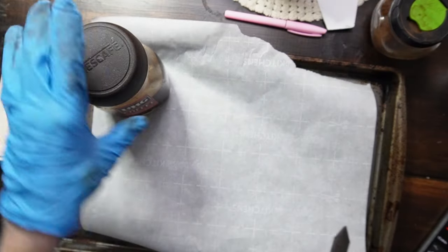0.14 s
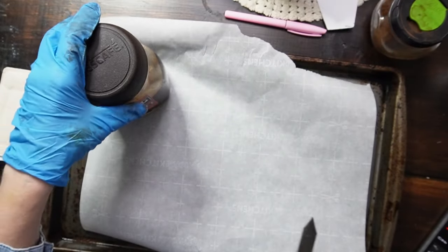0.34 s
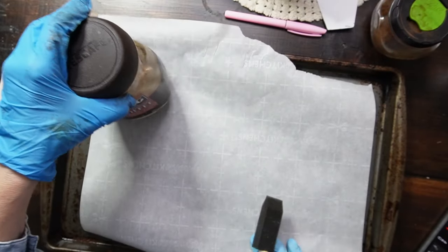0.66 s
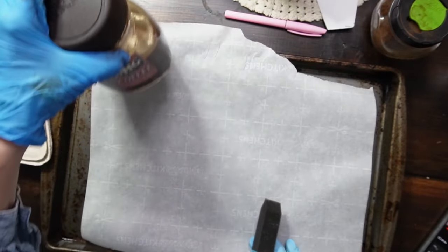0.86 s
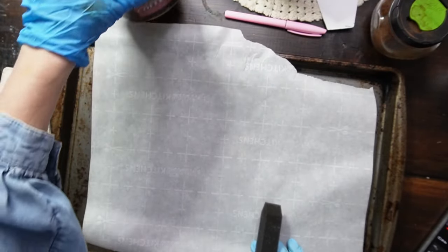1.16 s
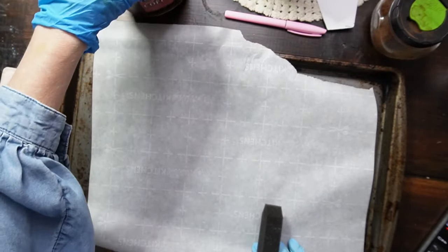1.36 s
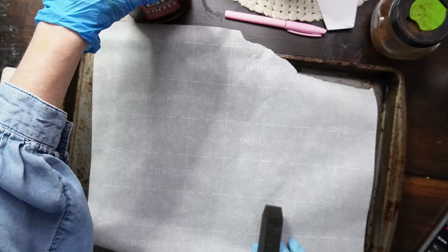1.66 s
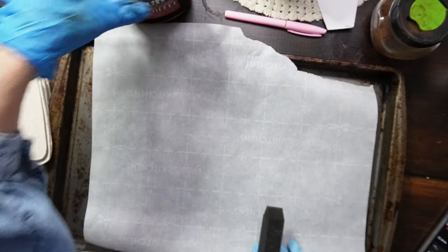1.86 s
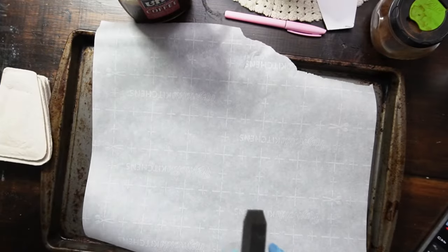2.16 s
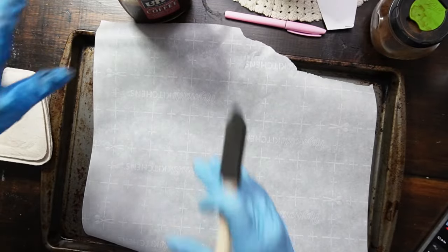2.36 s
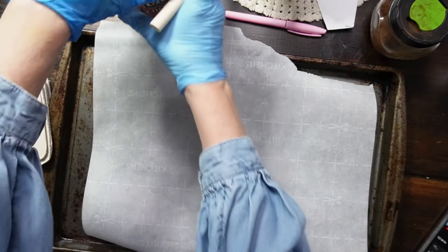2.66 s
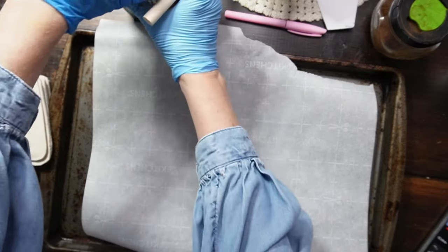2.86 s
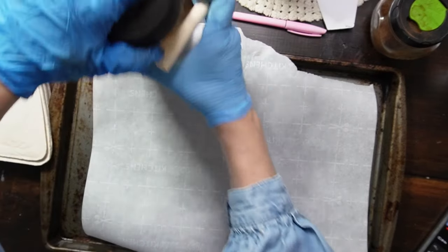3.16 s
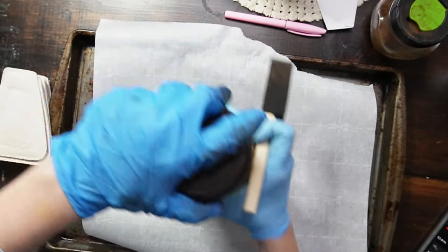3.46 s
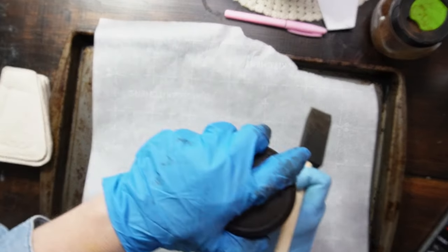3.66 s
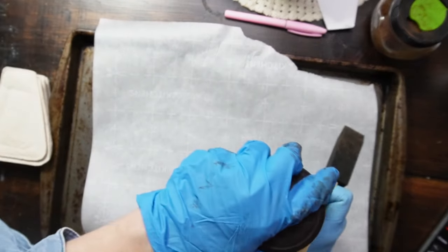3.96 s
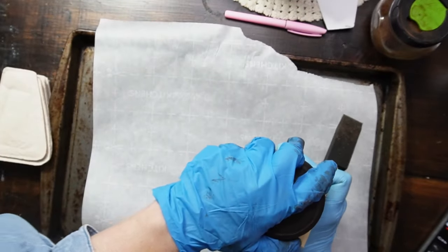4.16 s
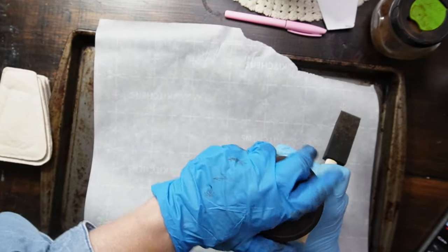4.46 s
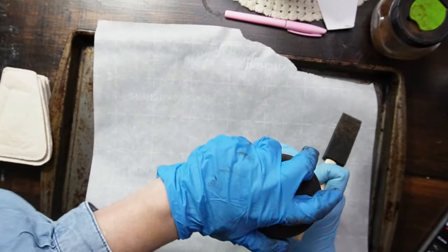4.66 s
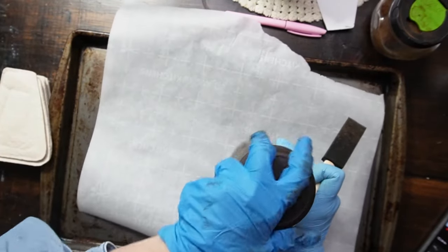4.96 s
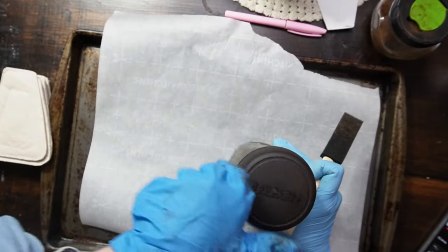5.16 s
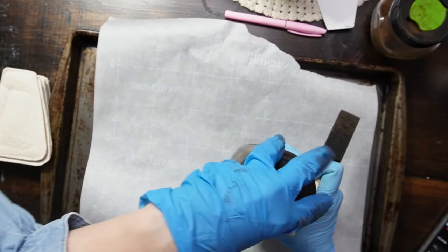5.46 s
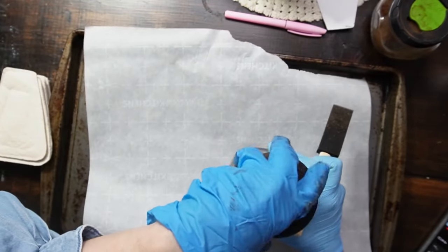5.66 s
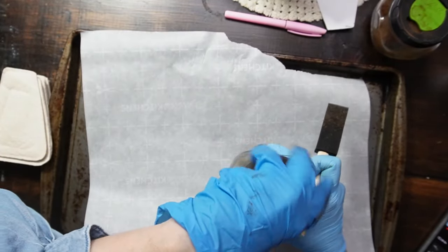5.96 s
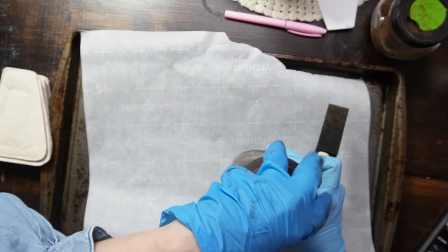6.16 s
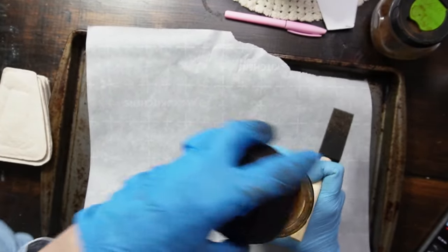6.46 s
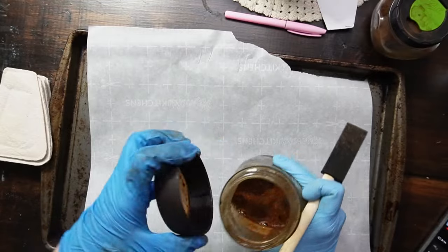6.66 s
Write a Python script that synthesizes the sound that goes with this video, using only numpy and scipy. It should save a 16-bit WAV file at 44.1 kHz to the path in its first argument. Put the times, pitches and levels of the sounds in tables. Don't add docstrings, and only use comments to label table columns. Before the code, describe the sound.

In a small quiet room, very close stereo microphones catch a jar dragged across crisp baking paper with dense crackles, then set down with a wooden knock. Gloves brush softly and squeak once on glass, with light tool taps. A stuck plastic lid creaks, jolts hard, grinds through gritty thread, then rattles and clinks sharply on the glass rim before soft rubbing ends it.

```python
import sys
import numpy as np
from scipy import signal
from scipy.io import wavfile
from scipy.ndimage import uniform_filter1d

SR = 44100
rng = np.random.default_rng(int(sys.argv[2]) if len(sys.argv) > 2 else 0)


def log_audio(samples):
    frames = np.atleast_2d(samples).T
    limited = np.clip(frames, -1, 1)
    pcm = np.round(limited * 32767).astype(np.int16)
    wavfile.write(sys.argv[1], SR, pcm)


def ratio(d):
    e = np.asarray(d, float) / 20
    return 10 ** e


N = 300621

# (frequency [Hz], density [dB per Hz])
RUB_COLOUR = [(150, -79.5), (410, -36.5), (700, -13.5), (779, -12.5), (996, -7.5), (1270, 4), (1650, 8.5),
              (2390, 9.5), (4950, 4.5), (9000, -20.5), (11700, -66), (19800, -120)]


def evened(x):
    return x / np.sqrt(np.mean(x ** 2) + 1e-20)


def read(points, hz):
    f, value = np.transpose(points)
    return np.interp(np.log(hz + 1), np.log(f + 1), value)


def add(mix, s, sound):
    part = mix[round(s * SR):][:len(sound)]
    part += sound[:len(part)]


def colour(x, points):
    gain_db = np.maximum(read(points, abs(np.fft.fftfreq(4096, 1 / SR))), -100)
    log_gain = np.log(ratio(gain_db))
    phase = -signal.hilbert(log_gain).imag
    taps = np.fft.ifft(np.exp(log_gain + 1j * phase)).real[:2048]
    return signal.oaconvolve(x, taps)[:len(x)]


def above(x, hz):
    return signal.sosfilt(signal.butter(4, hz, "high", fs=SR, output="sos"), x)


def resonate(x, hz, width_hz):
    r = np.exp(-np.pi * width_hz / SR)
    if np.ndim(hz) == 0:
        return 2 * signal.lfilter([1 - r], [1, -r * np.exp(2j * np.pi * hz / SR)], x).real
    turn = np.exp(2j * np.pi * np.cumsum(hz) / SR)
    return 2 * (turn * signal.lfilter([1 - r], [1, -r], x / turn)).real


def ring(modes, stretch=1, detune=0.0008, jumble=1):
    t = np.arange(SR // 3) / SR
    hz, db, t60_s = np.transpose(modes)[:, :, None]
    chance = rng.random((len(modes), 2))
    mode_hz = hz * (1 + detune * (2 * chance[:, :1] - 1))
    phase = 2 * np.pi * (mode_hz * t + jumble * chance[:, 1:])
    onset = 1 - np.exp(-t * hz * 0.75)
    return ratio(db - 60 * t / (t60_s * stretch)) * np.sin(phase) * onset


def chatter(x, decay_s):
    t = np.arange(2000) / SR
    run = rng.standard_normal(len(t)) * (rng.random(len(t)) < 0.02) * np.exp(-t / decay_s)
    run[0] = 3.5
    return signal.fftconvolve(x, run / np.linalg.norm(run))[:len(x)]


def slips(per_s, spread_db, clump_db, clump_s):
    size_db = spread_db * np.minimum(rng.exponential(1, N), 5)
    size = ratio(size_db) * np.sign(rng.standard_normal(N))
    clumps = evened(resonate(rng.standard_normal(N), 0, 1 / clump_s))
    return size * (rng.random(N) < per_s / SR) * ratio(clump_db * clumps)


def strokes(rows, plus_db=0):
    span_db, roundness = 20, 1.27
    t = np.arange(0, N, 32) / SR
    s, db, rise_s, fall_s = np.transpose(rows)[:4, :, None]
    away = np.where(t < s, (s - t) / rise_s, (t - s) / fall_s)
    shape_db = db + np.reshape(plus_db, (-1, 1)) - span_db * away ** roundness
    return np.interp(np.arange(N) / SR, t, (ratio(shape_db) ** 2).sum(0))


def ringing(rows, rings, per_s):
    drive = slips(per_s, 2.5, 1.5, 0.008) * np.sqrt(strokes(rows))
    ring_power = sum(ratio(2 * db) * np.pi * width_hz / SR for hz, width_hz, db in rings)
    plain = np.sqrt(per_s / SR * 3 * ring_power)
    rung = sum(ratio(db) * resonate(drive, hz, width_hz) for hz, width_hz, db in rings) / plain / 2
    return signal.sosfilt(signal.butter(2, [500, 5000], "band", fs=SR, output="sos"), rung)


def patchy(x, depth_db):
    z = signal.stft(x, SR, nperseg=128, noverlap=96)[2]
    field = rng.standard_normal(z.shape)
    field = uniform_filter1d(field, size=3, axis=0)
    field = evened(uniform_filter1d(field, size=14, axis=1))
    gain = ratio(depth_db * field - 0.115 * depth_db ** 2)
    return signal.istft(z * gain, SR, nperseg=128, noverlap=96)[1][:N]


def room_air():
    # (frequency [Hz], density [dB per Hz])
    air_colour = [(18, -43), (30, -42), (86, -24.5), (348, -6.5), (830, -2), (998, 0.5), (1600, 0.5),
                  (1880, 3.5), (3730, -3), (4730, -2.5), (7800, -14), (15700, -17), (16300, -30)]
    noise = rng.standard_normal((2, N))
    return ratio(-59.5) * evened(np.array([colour(n, air_colour) for n in noise]))


def room_tail(x):
    # (frequency [Hz], decay time t60 [s])
    decay = [(200, 0.39), (1000, 0.26), (4000, 0.28), (12000, 0.2)]
    taps = np.zeros((2, SR // 2))
    starts = np.arange(130, SR // 2 - 22, 22)
    at = starts + rng.integers(0, 22, (2, len(starts)))
    np.put_along_axis(taps, at, rng.choice([-1., 1.], at.shape), 1)
    hz, t, z = signal.stft(taps, SR, nperseg=256)
    fade = ratio(-60 * t / read(decay, hz)[:, None])
    tail = signal.istft(z * fade, SR, nperseg=256)[1]
    return signal.fftconvolve(x[None], tail / np.linalg.norm(tail[0]), axes=1)[:, :N]


def scattered(x):
    scatter = rng.standard_normal((2, 200)) * np.exp(-np.arange(200) / 50)
    early = signal.oaconvolve(x[None], scatter / np.linalg.norm(scatter[0]), axes=1)[:, :N]
    turn = 2 * np.pi * 4.3 * np.arange(N) / SR
    return early[0] * np.cos(turn) + early[1] * np.sin(turn)


def drumming():
    # (peak time [s], level [dB], rise [s], fall [s], pitch of the hollow [Hz])
    shudders = [(.555, -57, 0.021, 0.14, 241), (1.58, -34, 0.022, 0.2, 203.2), (1.69, -49, .05, .08, 203),
                (1.739, -56, 0.04, .08, 238), (1.815, -48, 0.03, 0.13, 220), (4.29, -42, 0.0073, 0.24, 249),
                (4.798, -29, 0.022, 0.064, 238), (4.92, -29, 0.086, 0.046, 193),
                (5.04, -36, .08, 0.21, 219), (5.165, -34.5, 0.087, 0.051, 238),
                (5.57, -39, 0.039, 0.069, 223), (5.45, -56, .02, 0.12, 207), (5.75, -65.5, .1, 0.056, 192),
                (5.87, -55, 0.012, 0.16, 266), (5.97, -48, 0.079, .3, 270),
                (6.042, -44.5, 0.23, 0.082, 334), (6.088, -35, 0.016, 0.15, 283),
                (6.23, -42.5, 0.065, 0.081, 222), (6.31, -56, .1, .1, 328), (6.37, -53.5, 0.18, 0.027, 422)]
    # (frequency [Hz], width [Hz], level [dB])
    tray_modes = [(162, 20, -7.5), (211, 15, 1.5), (259.6, 33, -0.5), (372, 53, -5)]
    drive = slips(400, 4.0, 1.6, 0.04)
    s, *_, pitch_hz = np.transpose(shudders)
    hollow_hz = np.interp(np.arange(N) / SR, s, pitch_hz)
    hollow = evened(resonate(resonate(drive, hollow_hz, 28), hollow_hz, 90))
    tray = evened(sum(ratio(db) * resonate(resonate(drive, hz, width_hz), hz, 4 * width_hz)
                      for hz, width_hz, db in tray_modes))
    return (0.68 * hollow + 0.49 * tray) * np.sqrt(strokes(shudders, -1.6))


def squeak():
    # (time [s], level [dB])
    swell = [
        (3.455, -79),
        (3.48, -41),
        (3.53, -31.5),
        (3.58, -43),
        (3.62, -57),
    ]
    drive = slips(4000, 2.1, 2.5, 0.006)
    s, db = np.transpose(swell)
    level_db = np.interp(np.arange(N) / SR, s, db, -120, -120)
    tone = resonate(drive, 3080, 200) + 0.45 * resonate(drive, 4300, 500)
    return ratio(level_db - 3.5) * evened(tone)


def taps():
    # (time [s], level [dB], frequency [Hz], decay time t60 [s])
    touches = [(3.228, -37, 1949, .1), (3.228, -35, 1740, .07), (3.265, -41, 1900, .08),
               (.527, -50, 1870, .06), (4.284, -21, 1940, .18), (6.075, -25, 287, .3),
               (5.04, -22, 720, .06), (5.152, -24.5, 250, .16), (4.906, -27, 205, .2), (1.57, -38, 143, .2),
               (4.9, -30, 510, .08), (1.553, -24, 2100, .08), (5.216, -28, 1350, .05),
               (6.076, -9, 1560, .03), (4.283, -34, 861, .1), (3.228, -40, 1300, .015),
               (4.79, -30, 520, .1), (2.87, -50, 4050, .12)]
    out = np.zeros(N)
    for s, db, hz, t60_s in touches:
        tap = ring([(hz, db, t60_s)])[0]
        add(out, s, chatter(tap, 0.012) if hz > 400 else tap)
    return out


def knocks():
    # (time [s], peak [dB], bass [dB relative], treble [dB relative], factor on t60 [1])
    blows = [(1.551, -16, -1, -6, 0.8), (1.794, -33.5, -7, 0, 0.5), (2.858, -35.5, 2.5, -21, 1.05),
             (4.279, -39, -28, 17, 1.8), (4.382, -25.5, -27, 1, 1.5), (4.428, -42, -17, -8, 1.1),
             (4.597, -9, -4.5, 6, 0.88), (4.997, -27.5, -26, -14.5, 1.5), (5.04, -19, -21, -12, 0.51),
             (5.191, -31, -10, -15, 0.28), (5.215, -30.5, 6, 2, 0.23)]
    # (frequency [Hz], level [dB], decay time t60 [s])
    wood = [(145, -5, .16), (203, -1, .15), (300, -3, .11), (430, -3, .1), (560, -1, .1), (673, -1, .09),
            (721, 0, .1), (860, 0, .08), (937, -2, .09), (1050, -3, .07), (1230, -4, .05), (1460, -4, .05),
            (1700, -3, .05), (1943, -2, .06), (2218, -4, .05), (2659, -4, .05)]
    # (frequency [Hz], density [dB per Hz])
    thud_colour = [(40, -36), (170, -13), (350, -8), (600, 0), (900, 0), (1400, -3), (2200, -9),
                   (5000, -60)]
    out, hz, t = np.zeros(N), np.array(wood)[:, 0], np.arange(SR // 3) / SR
    front = 1.4 * np.exp(-t / 0.0005)
    for s, db, bass_db, treble_db, stretch in blows:
        group_db = np.select([hz < 260, hz > 1500], [bass_db + 0.5, treble_db - 4], -11.)
        modes = chatter(ratio(group_db) @ ring(wood, stretch, detune=0.02, jumble=0.25), 0.018)
        thud_fade = ratio(-60 * t / (0.25 * stretch)) + front
        thud = colour(rng.standard_normal(len(t)) * thud_fade, thud_colour)
        rattle_fade = ratio(-60 * t / (0.22 * stretch)) + front
        rattle = colour(rng.standard_normal(len(t)) * rattle_fade, RUB_COLOUR)
        blow = modes + ratio(4.5) * thud / abs(thud).max()
        blow += ratio(treble_db + 2.5) * rattle / abs(rattle).max()
        add(out, s, ratio(db) * blow)
    return above(out, 179) + ratio(-16.5) * above(out, 40)


def clinks():
    # (time [s], peak [dB], upper rings [dB relative], hollow [dB relative], factor on t60 [1])
    touches = [
        (5.9225, -17.5, -14, 4, 0.32),
        (6.01, -15.5, -2.5, -5, 0.96),
        (6.0486, -31, 12.5, -5, 0.71),
        (6.0695, 4, -5.5, -2, 0.35),
        (6.0886, -3.5, -10.5, -4.5, 0.93),
        (6.1194, -6, -15.5, -3, 0.38),
        (6.166, -40, -5, -34.5, 0.56),
        (6.209, -32, 2, 13, 0.25),
        (6.304, -35.5, -19, 0, 0.71),
        (6.324, -36.5, 6.5, 13, 0.29),
    ]
    # (frequency [Hz], level [dB], decay time t60 [s])
    glass = [(750, -5, .1), (940, -4, .1), (1055, -4, .15), (1500, -4, .08), (1542, -2, .17),
             (1604, -4, .1), (1644, -1, .17), (1705, -3, .15), (1970, -10, .12), (2380, -7, .1),
             (2550, -6, .12), (3340, -1, .2), (3565, 0, .15), (3946, -7, .12), (4113, -2, .09),
             (4640, -6, .1), (5900, -8, .05)]
    out, hz, t = np.zeros(N), np.array(glass)[:, 0], np.arange(SR // 3) / SR
    for s, db, upper_db, hollow_db, stretch in touches:
        group_db = -13 + (upper_db + 0.5) * (hz > 2200) + (hollow_db - 1) * (hz < 1200)
        rings = ratio(group_db) @ ring(glass, 0.85 * stretch, jumble=0.12)
        rings = rings * (1 + 1.4 * np.exp(-t / 0.0049))
        crack = colour(rng.standard_normal(len(t)) * ratio(-60 * t / 0.0053), RUB_COLOUR)
        add(out, s, ratio(db) * (rings + ratio(upper_db - 4) * crack / abs(crack).max()))
    return out


def rattles():
    # (peak time [s], level [dB], rise [s], fall [s])
    bursts = [(5.605, -23, 0.034, 0.034), (5.94, -39, 0.011, .05), (5.958, -34, .01, 0.03),
              (5.985, -35, 0.03, .04), (6.011, -20, 0.029, 0.04), (6.035, -34, .03, .08),
              (6.06, -25, 0.023, .04), (6.077, -7.5, 0.0033, 0.021), (6.1, -23, .01, 0.041),
              (6.122, -19.5, 0.018, 0.042), (6.165, -38, .03, 0.026), (6.19, -43, .03, .04),
              (6.212, -40, .01, 0.04), (6.235, -47, .01, .04)]
    # (frequency [Hz], width [Hz], level [dB])
    rim_rings = [(915, 83, 2), (1518, 52, 9.5), (1625, 36, 6), (1940, 48, -1), (3350, 60, -12),
                 (3500, 64, -3), (4070, 120, -9), (4700, 62, -27)]
    return ringing(bursts, rim_rings, 900)


def creaks():
    # (peak time [s], level [dB], rise [s], fall [s])
    bursts = [
        (4.283, -17.5, .004, 0.058),
        (4.32, -20, .015, 0.056),
        (4.384, -28, .005, .1),
        (4.398, -28, .015, .12),
        (4.43, -59, .02, 0.09),
        (4.52, -35, .05, 0.11),
        (4.61, -45, .01, 0.13),
        (4.885, -37, .03, 0.053),
        (5.015, -19, .03, 0.066),
        (5.12, -23.5, .03, 0.12),
    ]
    # (frequency [Hz], width [Hz], level [dB])
    lid_rings = [(864, 70, 6), (1465, 73, 6.5), (1730, 35, -17), (1924, 60, 7), (2210, 30, -17),
                 (2800, 30, -17), (3050, 240, 3.5), (4100, 54, -23)]
    return ringing(bursts, lid_rings, 1500)


def snaps():
    # (time [s], peak [dB], pitch [Hz])
    sharp = [(0.618, -12.5, 4170), (0.7446, -15, 2560), (0.7514, -6.5, 2620), (0.8094, -12, 2460),
             (1.0996, -10, 2647), (1.262, -17, 2980), (2.165, -20, 3480), (2.2322, -15, 4300),
             (1.9034, -17, 3260), (1.517, -19.5, 3030), (1.5525, -19.5, 2100), (2.1433, -27, 2250),
             (2.7921, -28.5, 5130), (3.057, -39, 4170), (4.8289, -11, 2050), (6.3632, -23.5, 3400)]
    # (time [s], peak [dB], pitch [Hz])
    crisp = [(0.48, -31, 1900), (0.6437, -13, 2580), (0.7154, -12, 2090), (0.9005, -11.5, 3030),
             (1.1877, -17, 2200), (1.2914, -14.5, 4000), (1.3004, -13.5, 2000), (1.8322, -16, 3200),
             (1.8509, -10, 3200), (1.951, -12, 2560), (1.9378, -26, 3000), (1.9767, -24, 5440),
             (1.8, -28, 3320), (1.337, -26, 2500), (.7262, -8, 4900), (0.65, -12, 4000), (.932, -24, 3900),
             (4.4963, -25, 3500), (.7984, -17, 4600), (5.1148, -15, 1500), (5.8609, -16, 3700),
             (1.2, -18, 2350)]
    # (time [s], peak [dB], pitch [Hz])
    dull = [(0.1302, -35.5, 3360), (0.7005, -4, 2200), (0.7774, -11, 1900), (1.044, -16, 1960),
            (1.1574, -18, 3400), (1.4232, -7.5, 3370), (1.488, -17.5, 2420), (1.5304, -18, 3200),
            (1.5914, -15, 3650), (1.8149, -14.5, 2720), (1.9896, -17, 4000), (2.0385, -16.5, 4070),
            (2.0943, -17, 3800), (2.2858, -23.5, 3280), (2.377, -32.5, 3200), (.66, -13, 3780),
            (1.445, -23, 3000), (2.6038, -29, 4100), (2.6244, -26.5, 2700), (3.3628, -25.5, 4840),
            (4.3244, -14, 1960), (5.1917, -20, 1730)]
    # (time [s], peak [dB], pitch [Hz])
    ticks = [(.6777, -11.5, 2630), (.8483, -11, 1900), (.8597, -14.5, 3340), (2.392, -32.5, 2150),
             (2.468, -34.5, 2800), (2.532, -39, 4630), (2.8, -33, 2140), (4.2613, -22, 2400),
             (4.5077, -25, 3110), (4.522, -32, 2100), (5.4627, -24, 2820), (5.4747, -25, 2090),
             (5.4966, -13.5, 3100), (5.5779, -17.5, 2020), (5.744, -26, 3220), (5.7954, -22, 4270),
             (5.8219, -22, 1630), (3.532, -25, 3100), (5.388, -36, 3600), (3.685, -40, 4000)]
    out, t = np.zeros(N), np.arange(900) / SR
    low = signal.butter(2, [1400, 5160], "band", fs=SR, output="sos")
    high = signal.butter(2, [5500, 9700], "band", fs=SR, output="sos")
    click_shape = np.sqrt(t / 0.001 + 0.078) * np.exp(-t / 0.0014)
    top_shape = np.exp(-t / 0.0017) + 0.15 * np.exp(-t / 0.0036)
    for rows, top_db in ((sharp, -10), (crisp, -12), (dull, -42), (ticks, -24)):
        for s, db, hz in rows:
            click = rng.standard_normal(len(t)) * click_shape
            body = signal.sosfilt(low, click) + 2.1 * resonate(click, hz, 480)
            top = signal.sosfilt(high, rng.standard_normal(len(t)) * top_shape)
            add(out, s, ratio(db) * (body / abs(body).max() + ratio(top_db + 2.5) * top))
    return out


def effort():
    # (peak time [s], level [dB], rise [s], fall [s], fine grit [dB relative])
    paper = [(0.0, -52, .1, 0.061, -13), (.3, -44.5, 0.012, .1, -2), (.345, -43, 0.082, 0.14, -1.5),
             (.46, -44.5, 0.068, 0.075, -9), (.57, -44.5, 0.11, 0.22, -15), (.63, -30, 0.075, 0.52, -8.5),
             (.621, -23, 0.011, 0.021, -4), (.646, -23.5, .006, 0.066, -14),
             (.679, -23.5, 0.0054, 0.077, -8), (.702, -19.5, 0.011, .03, -13), (.718, -22, .005, 0.066, 1),
             (.746, -22.5, .006, 0.04, 4), (.777, -20, 0.036, 0.025, -17), (.815, -25.5, 0.052, 0.11, -6.5),
             (.902, -30.5, 0.0035, 0.078, -5), (1.77, -39, 0.01, .1, -22), (.85, -23, 0.01, 0.059, -1.5),
             (1.09, -30.5, 0.1, 0.11, -9.5), (1.19, -36.5, 0.15, 0.23, -6.5),
             (1.301, -30, 0.042, 0.092, -4), (1.429, -32.5, 0.005, 0.042, 4),
             (1.525, -38.5, 0.11, 0.21, -4), (1.565, -40, 0.012, 0.065, -4), (2.143, -42, .008, .08, -12),
             (2.29, -35.5, .006, 0.05, -14), (1.83, -29.5, 0.054, 0.24, -4.5), (1.954, -44, 0.31, 0.023, 2),
             (2.037, -32, 0.044, 0.058, -24), (2.15, -36, 0.18, 0.33, -23), (2.29, -41, 0.58, 0.081, -2.5)]
    # (peak time [s], level [dB], rise [s], fall [s], fine grit [dB relative])
    glove = [
        (2.498, -48, 0.65, 0.4, -9),
        (2.75, -41.5, 0.13, 0.087, -1.5),
        (2.893, -44.5, 0.11, 0.12, 2.5),
        (3.237, -52.5, 0.12, 0.31, 11.5),
        (3.41, -41, 0.11, 0.12, -0.5),
        (3.54, -39, 0.12, 0.18, -5),
        (3.95, -54.5, 1, 0.97, -5),
    ]
    # (peak time [s], level [dB], rise [s], fall [s], fine grit [dB relative])
    scrape = [(4.259, -34.5, 0.017, 0.05, -11), (4.514, -26.5, 0.043, 0.079, -8.5),
              (4.66, -35, 0.051, 0.17, -10), (4.782, -20, 0.0024, 0.11, -3.5),
              (4.805, -19.5, 0.027, 0.049, -22), (4.834, -16.5, 0.037, 0.045, 4),
              (4.884, -20, 0.067, 0.045, -10), (4.998, -21.5, 0.01, 0.057, -5),
              (5.015, -23, .02, 0.067, -10), (4.95, -26, 0.076, 0.26, -4.5), (5.075, -25, .03, 0.035, -8),
              (5.124, -30, 0.2, 0.068, -0.5), (5.25, -44, 0.15, 0.35, -3), (5.501, -28.5, 0.076, 0.11, -14),
              (5.465, -36, 0.01, .08, -4), (5.54, -29, 0.091, 0.12, 0), (5.582, -24, 0.064, 0.069, -2.5),
              (4.482, -36.5, 0.012, 0.15, -7), (5.714, -30.5, 0.23, 0.15, -4),
              (5.861, -29.5, 0.014, 0.053, 2), (6.013, -36, 0.21, 0.28, -4),
              (6.079, -22, 0.0051, 0.076, -8.5), (6.37, -59, 0.17, 0.34, -16),
              (6.488, -31.5, 0.15, 0.079, -5), (6.649, -34.5, 0.16, 0.11, -8.5),
              (6.75, -45, 0.35, 0.47, -9.5)]
    # (peak time [s], level [dB], rise [s], fall [s], lid body [dB relative])
    bind = [
        (1.8, -34, 0.03, 0.26, -2),
        (4.29, -28.5, 0.018, 0.13, 4.5),
        (4.388, -52, 0.025, 0.21, 15),
        (4.599, -11, 0.0035, 0.03, 2),
        (4.606, -18.5, 0.0077, 0.027, 9.5),
        (4.915, -34, 0.14, 0.043, 13.5),
        (5.012, -23.5, 0.02, 0.062, 7),
        (5.11, -30.5, 0.11, 0.14, 5),
        (5.2, -55, .1, 0.068, 7),
        (5.582, -20.5, 0.041, 0.045, 1),
    ]
    paper_db, glove_db, scrape_db, bind_db = (np.array(rows)[:, -1] for rows in (paper, glove, scrape, bind))
    # (strokes, grit [dB relative], lid body [dB relative])
    kinds = ((paper, paper_db, -13.5), (glove, glove_db, -12.5), (scrape, scrape_db, -7), (bind, -58, bind_db))
    rub = sum(strokes(rows) for rows, _, _ in kinds)
    grit = sum(strokes(rows, grit_db) for rows, grit_db, _ in kinds)
    lid = sum(strokes(rows, lid_db) for rows, _, lid_db in kinds)
    rub, grit, lid = (10 * np.log10(power + 1e-12) for power in (rub, grit, lid))
    return rub, grit - rub, lid - rub


def rubbing():
    # (frequency [Hz], density [dB per Hz])
    grit_colour = [(3240, -38), (5500, -4.5), (11800, -13.5), (14800, -18.5), (15900, -28), (16300, -56)]
    # (frequency [Hz], width [Hz], level [dB])
    lid_modes = [(347, 30, 7), (570, 39, -3.5), (745, 78, -8.5), (1210, 500, 7), (1130, 470, -5)]
    rub_db, grit_db, lid_db = effort()
    drive = slips(7000, 2.3, 1.5, 0.01)
    surface = evened(colour(drive, RUB_COLOUR))
    light = np.clip((grit_db + 13) / 13.2, 0, 1) * np.clip((-29.5 - rub_db) / 16.1, 0, 1)
    surface = (1 - light) * surface + light * evened(above(surface, 2200))
    grit = evened(colour(0.5 * drive + slips(2500, 2.55, 0.83, 0.0024), grit_colour))
    body = sum(ratio(db) * resonate(drive, hz, width_hz) for hz, width_hz, db in lid_modes)
    lid = evened(above(body, 493))
    return ratio(rub_db) * (surface + ratio(grit_db - 6.5) * grit + ratio(lid_db - 7) * lid)


def scene():
    # (frequency [Hz], side minus mid [dB])
    width = [(60, -39), (250, -13.5), (700, -4), (1500, -7.5), (3000, -2.5), (6000, 3), (10000, 7),
             (15000, 4.5)]
    # (frequency [Hz], left minus right [dB])
    lean = [(500, -0.1), (4000, 0), (9000, 1.5)]
    near = drumming() + above(snaps() + squeak(), 1630) + knocks() + clinks() + taps() + rattles()
    near = near + above(patchy(rubbing() + creaks(), 2.8), 170)
    air, air_side = room_air()
    tail, tail_side = room_tail(near)
    mid = ratio(-1.5) * near + ratio(-11) * tail + air
    side = ratio(-17) * scattered(near) + ratio(-16) * tail_side + air_side
    side = above(colour(side, width), 90)
    left = colour(mid + side, [(hz, db / 2) for hz, db in lean])
    right = colour(mid - side, [(hz, -db / 2) for hz, db in lean])
    return np.array([left, right])


def band_limit(x):
    return signal.sosfilt(signal.butter(12, 16460, fs=SR, output="sos"), x)


def record(dry):
    edge = signal.firwin(511, 15800, window=("kaiser", 8), fs=SR)
    kept = signal.oaconvolve(np.clip(dry, -1, 1), edge[None], "same", axes=1)
    return band_limit(kept)


dry = scene()
out = record(dry)
log_audio(out)
```